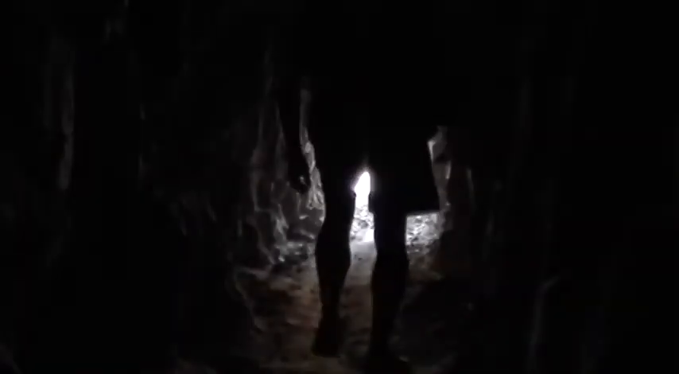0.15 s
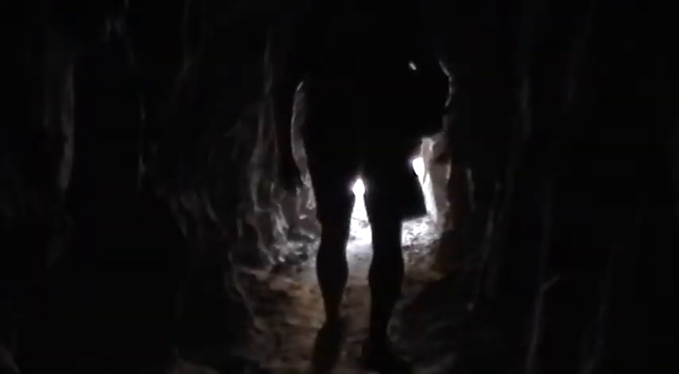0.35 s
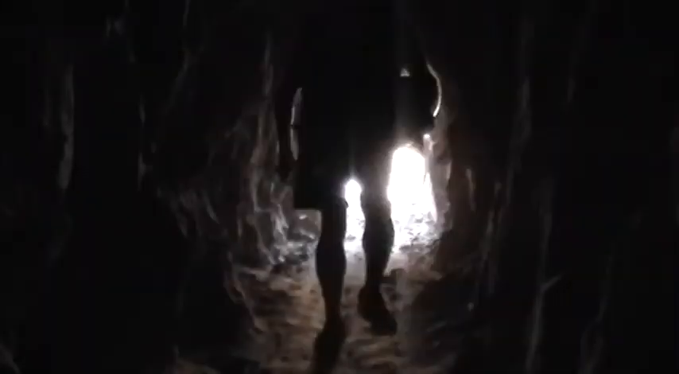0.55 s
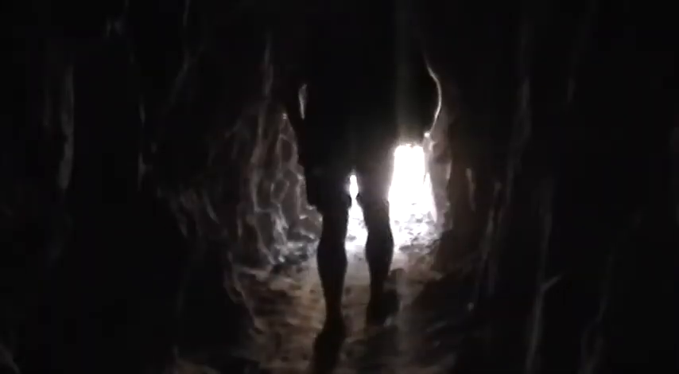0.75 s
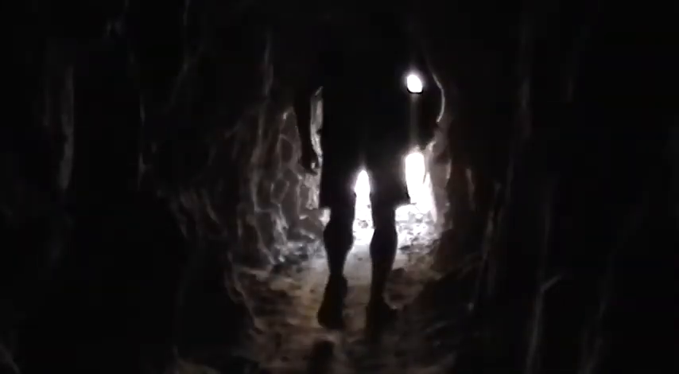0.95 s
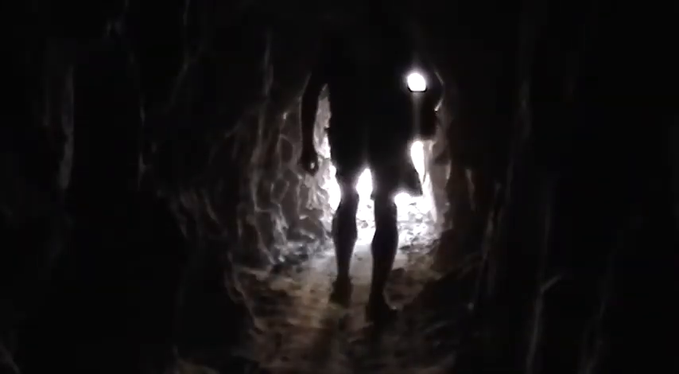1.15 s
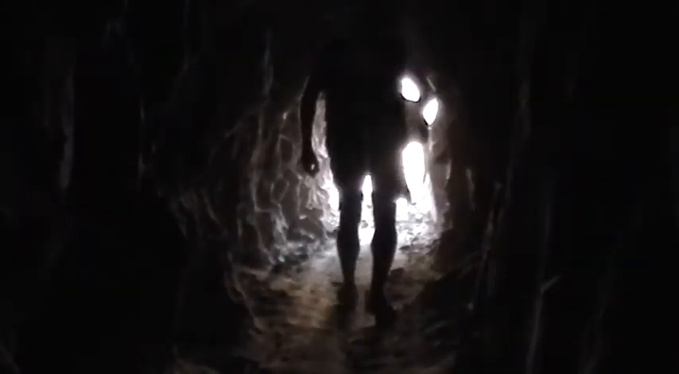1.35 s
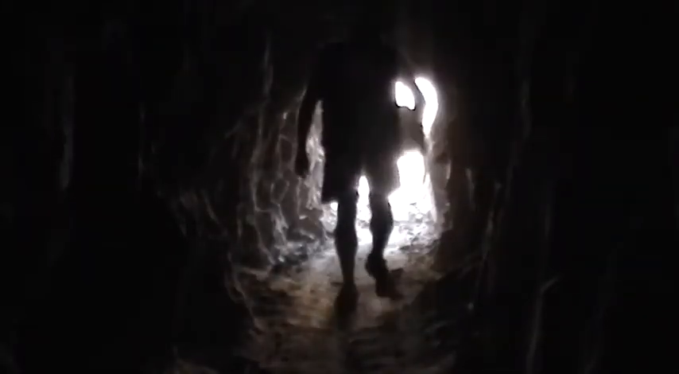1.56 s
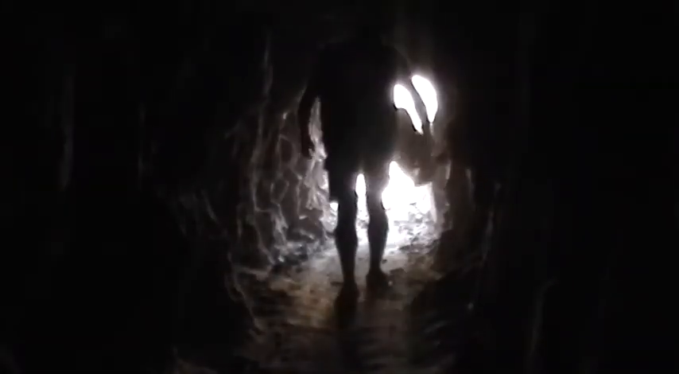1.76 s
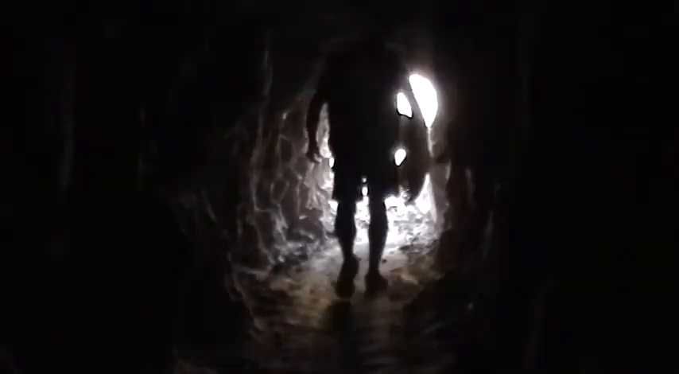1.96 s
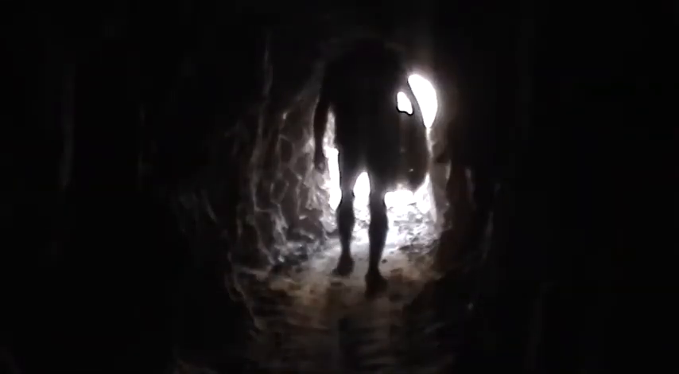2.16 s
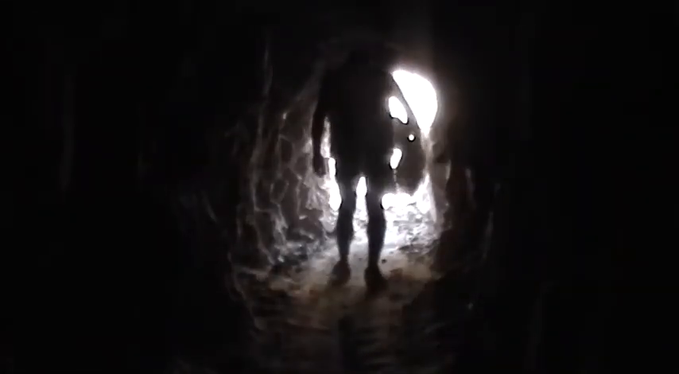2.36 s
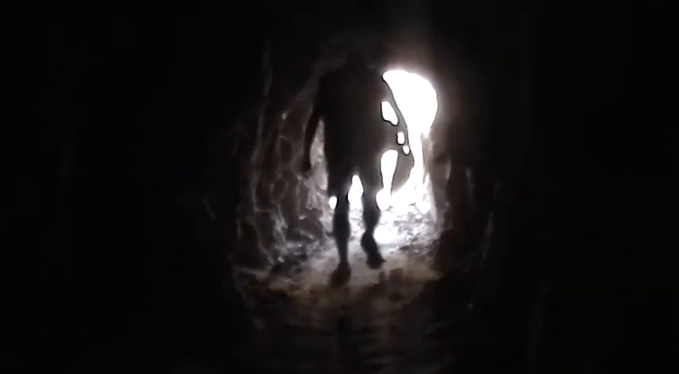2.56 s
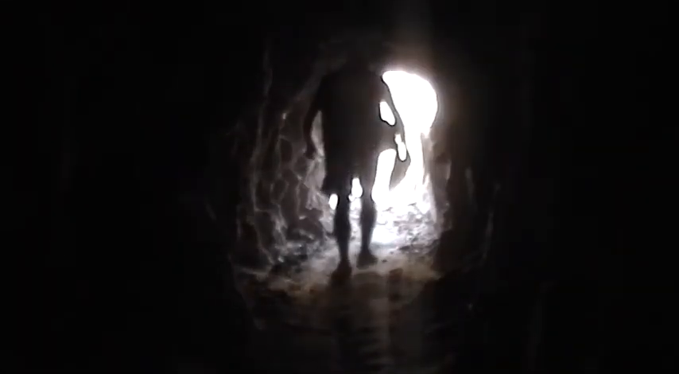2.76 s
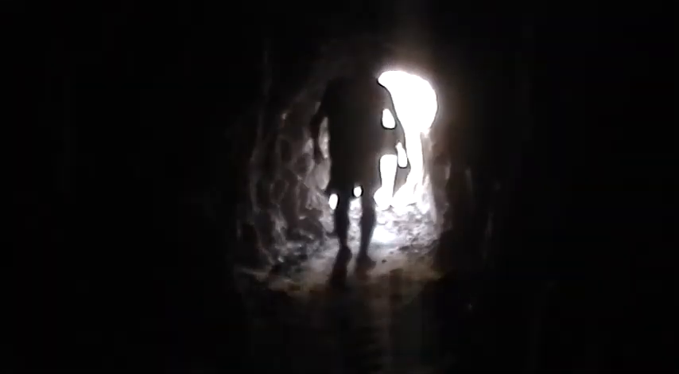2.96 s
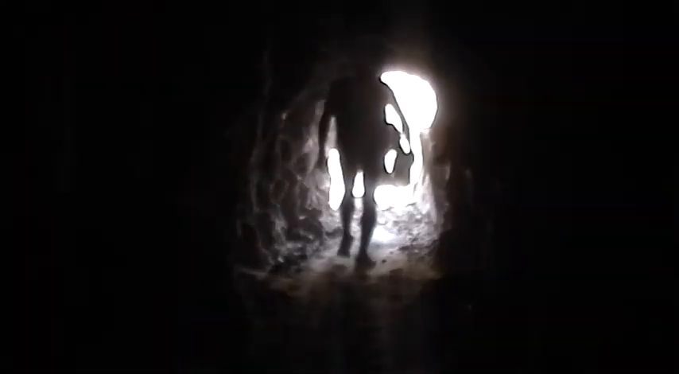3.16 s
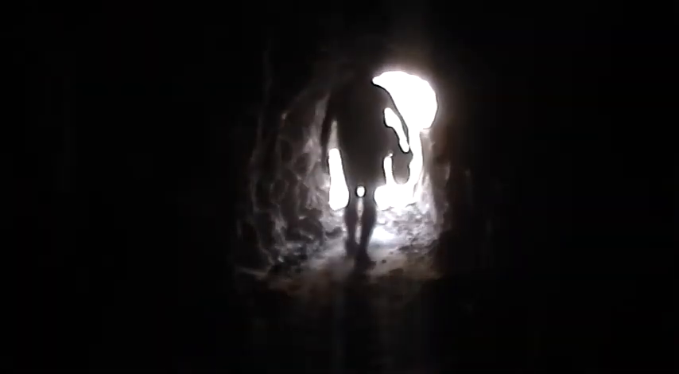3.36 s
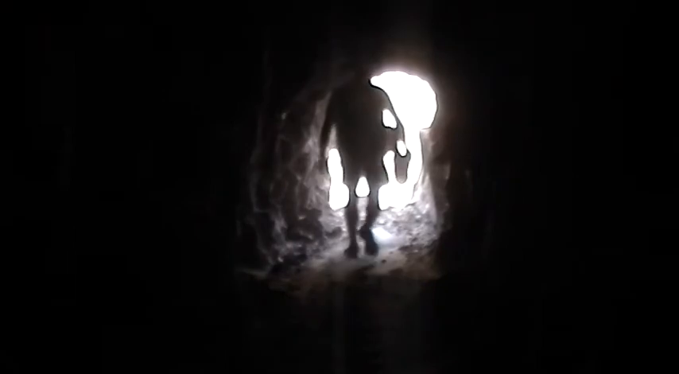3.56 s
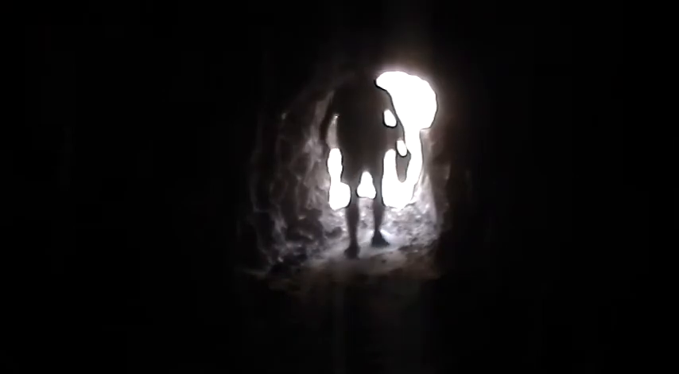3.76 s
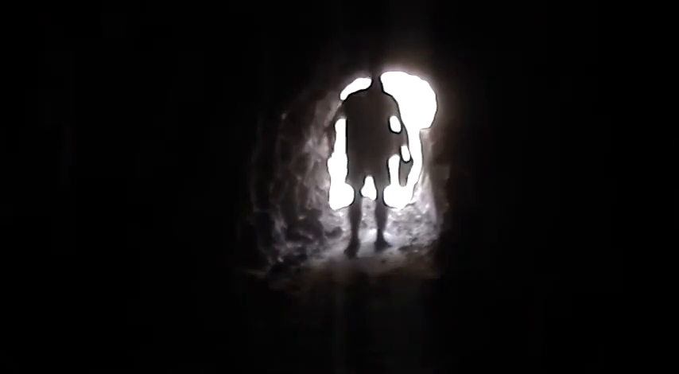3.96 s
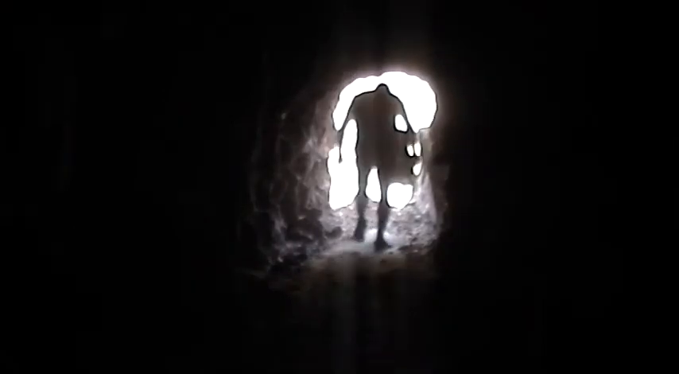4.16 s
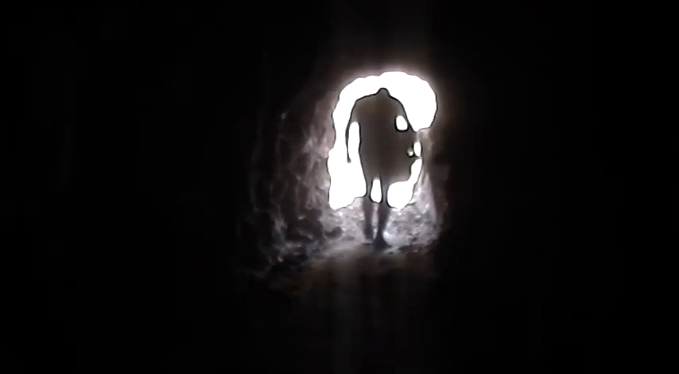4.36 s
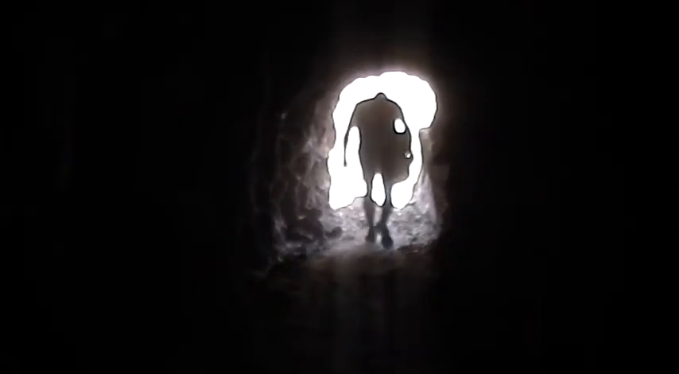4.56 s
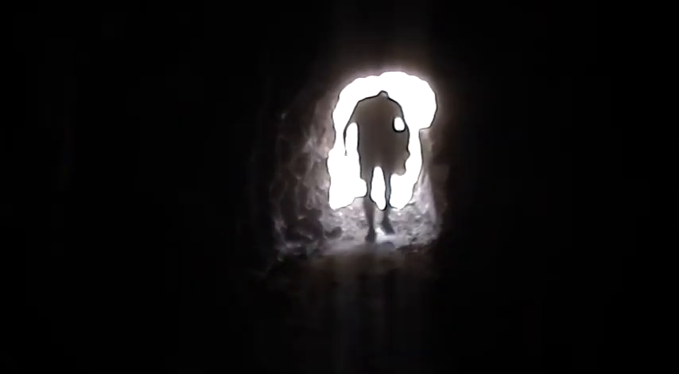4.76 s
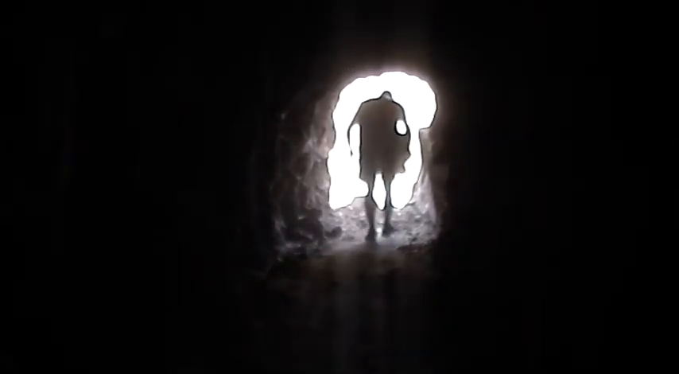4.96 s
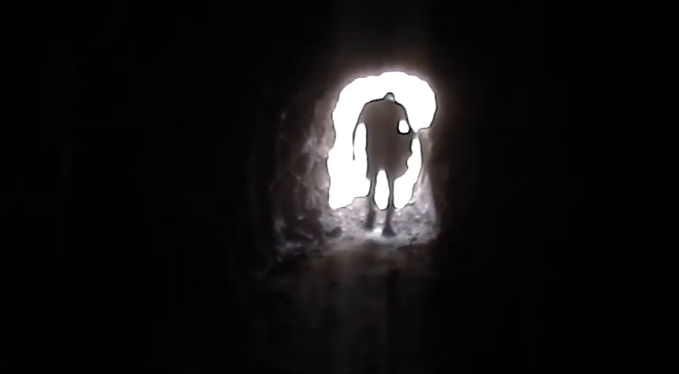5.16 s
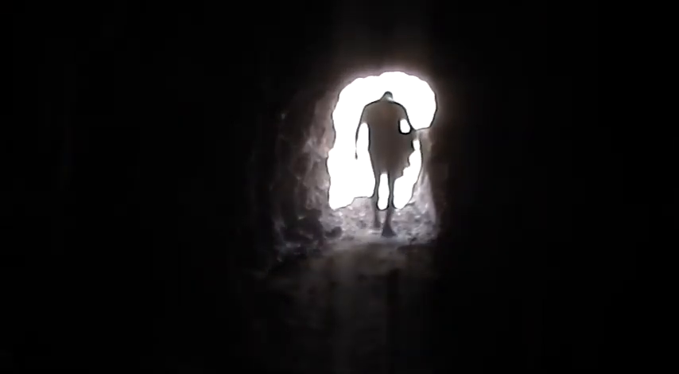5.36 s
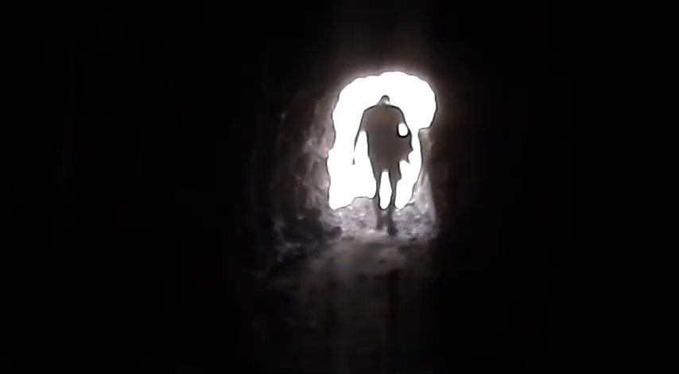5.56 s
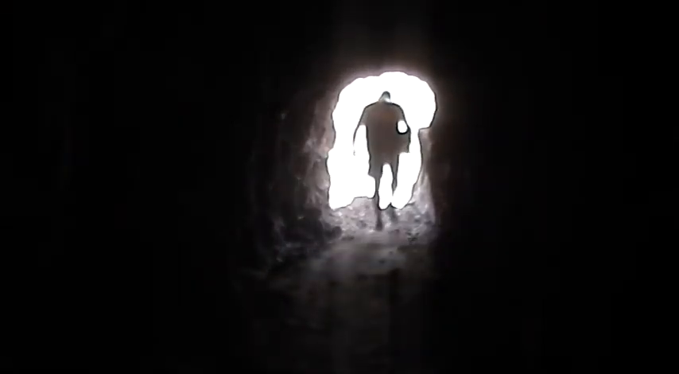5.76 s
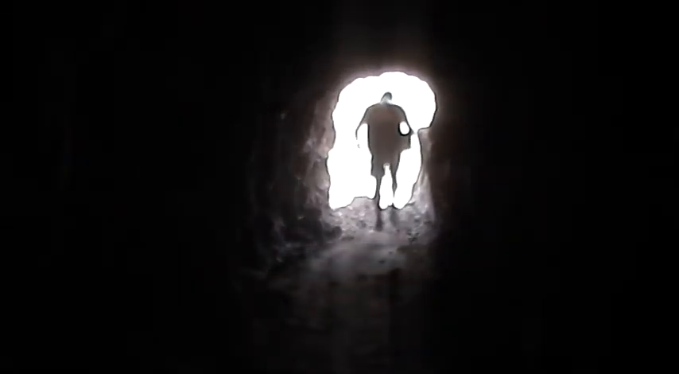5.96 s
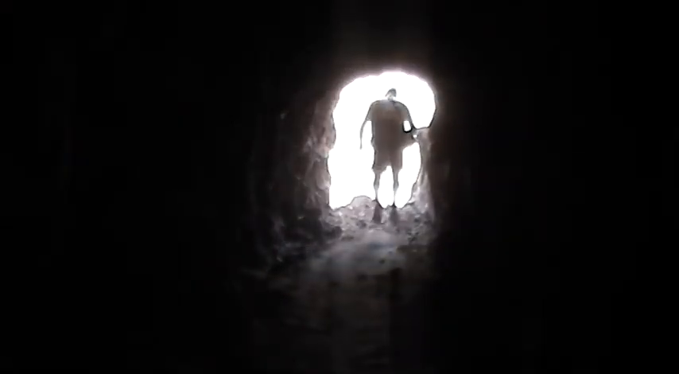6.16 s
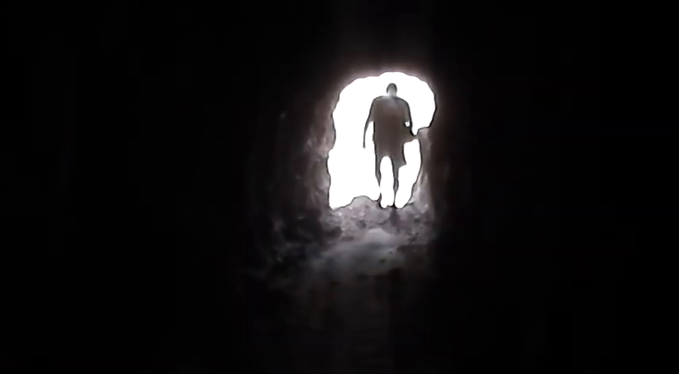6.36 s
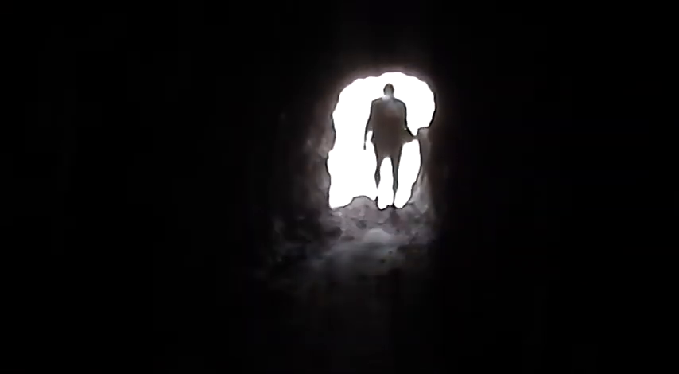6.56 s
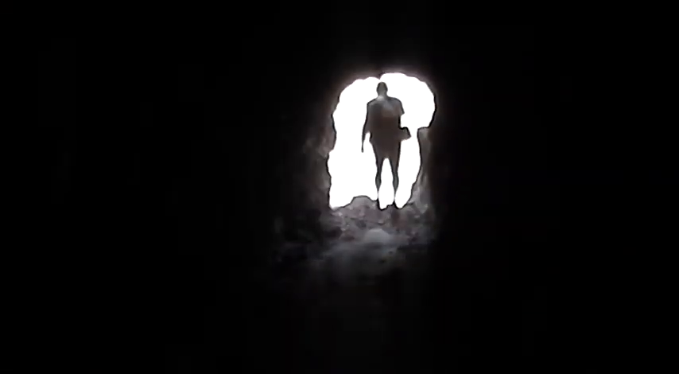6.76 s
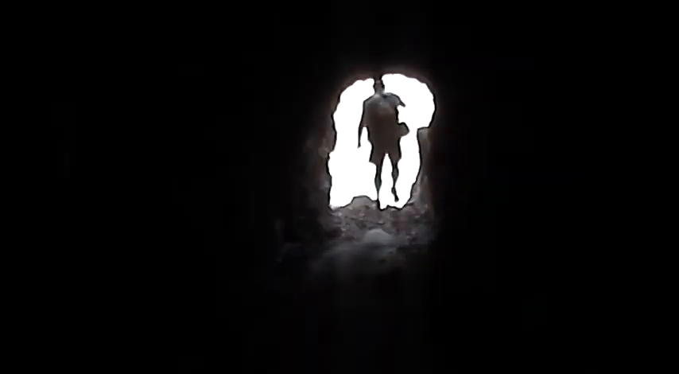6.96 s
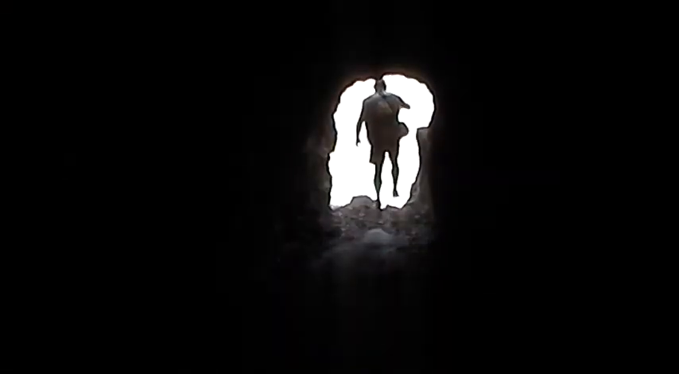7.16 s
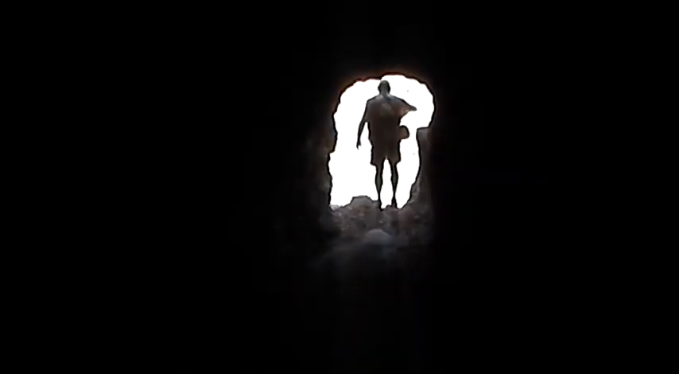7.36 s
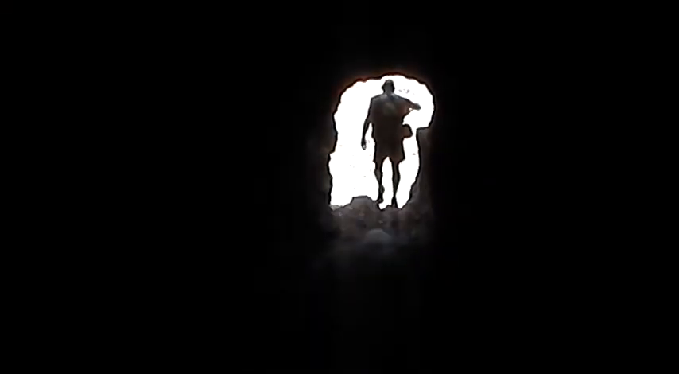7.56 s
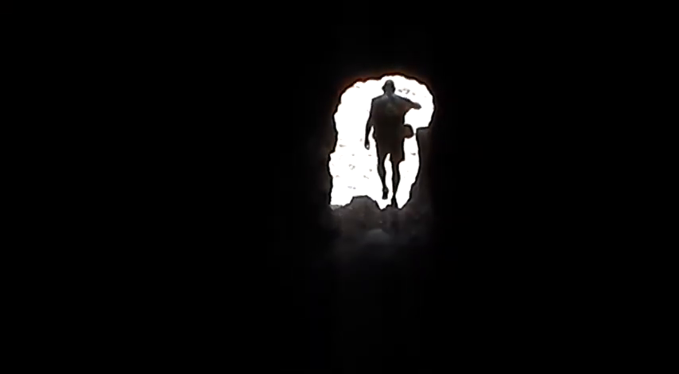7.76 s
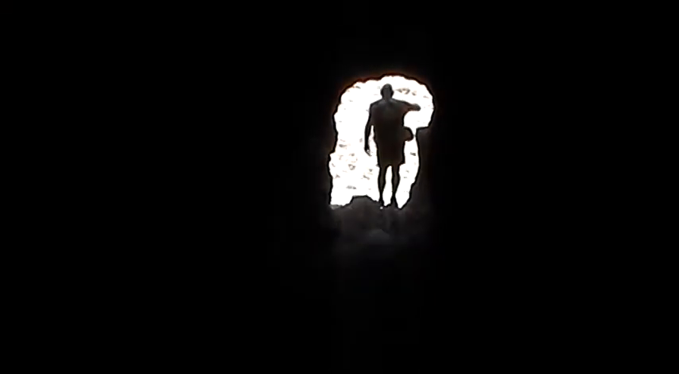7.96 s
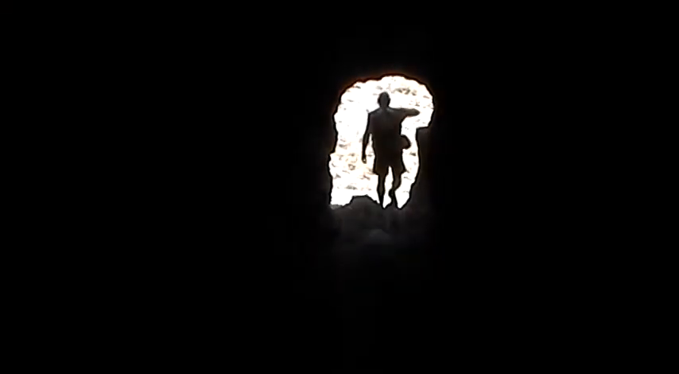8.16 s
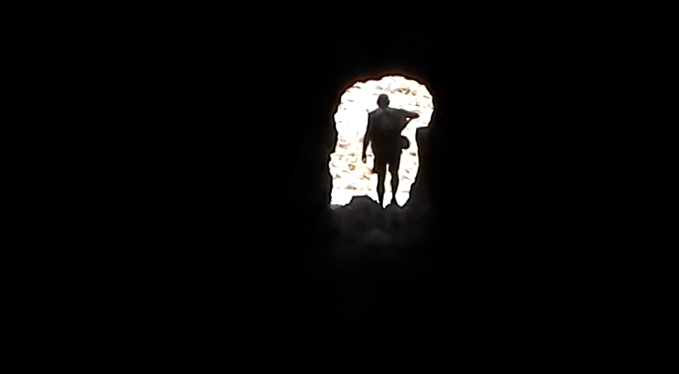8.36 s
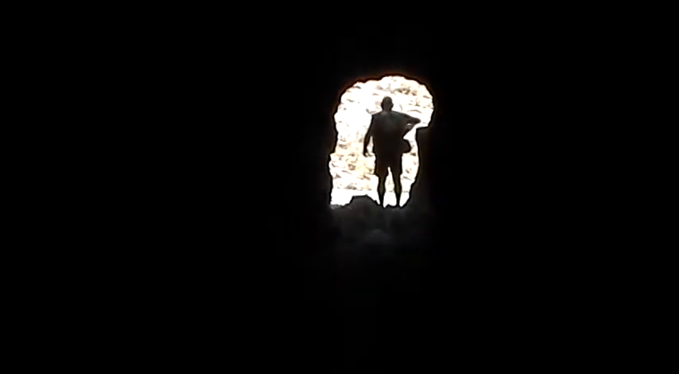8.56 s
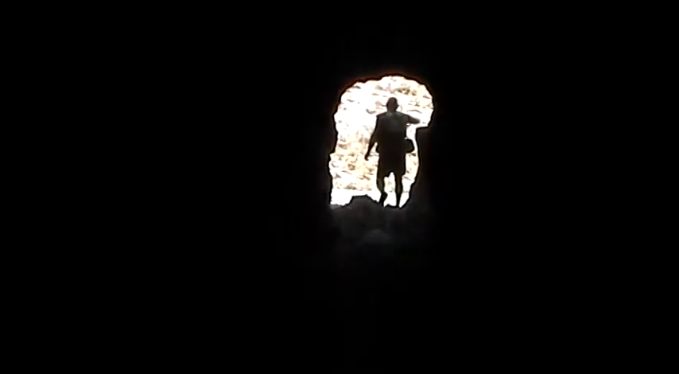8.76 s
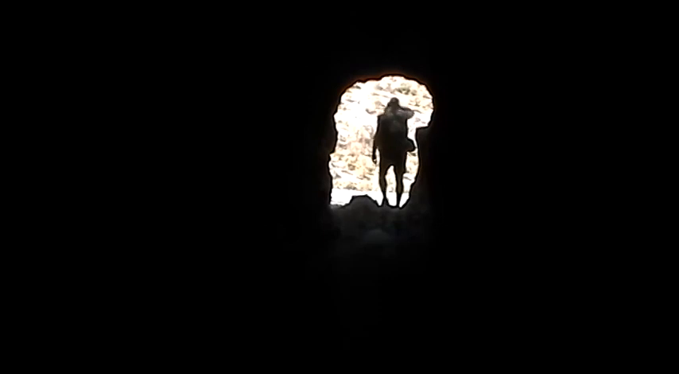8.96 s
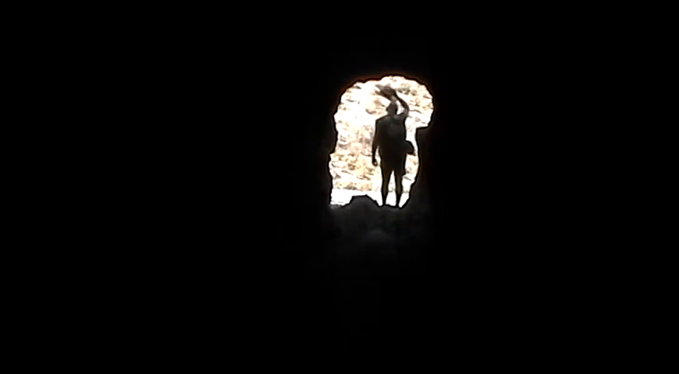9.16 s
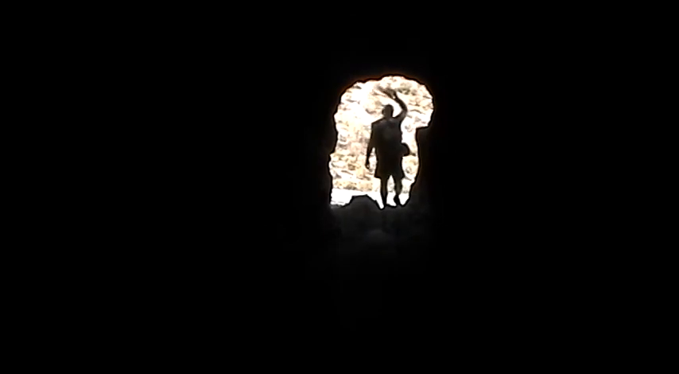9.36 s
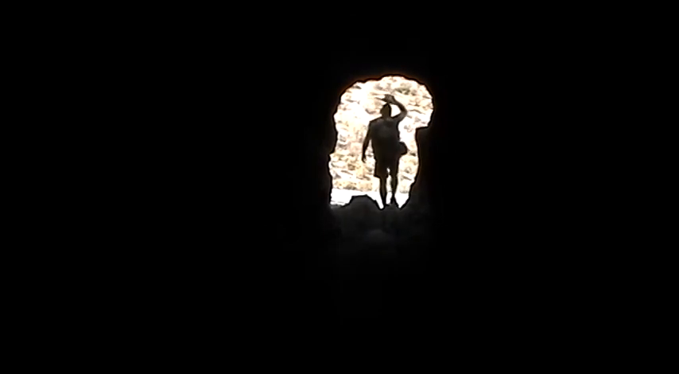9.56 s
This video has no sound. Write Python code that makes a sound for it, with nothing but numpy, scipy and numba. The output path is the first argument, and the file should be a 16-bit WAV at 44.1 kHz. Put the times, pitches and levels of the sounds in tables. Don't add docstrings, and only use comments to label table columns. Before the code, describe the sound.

A walker starts right beside a small stereo camcorder and heads off through a stony mine tunnel. Loud, hard cracks, dull thuds and gravelly scrapes come first, tangled with rolling pebbles and fine grit snaps. Something metal jingles faintly once. Later footfalls are quieter, separate crunches and small clicks, smeared by the rough walls with the low tones lingering. Soft tape hiss and motor rumble continue underneath throughout.

```python
import sys
import numpy as np
from scipy import signal
from scipy.fft import rfft, irfft, next_fast_len
from scipy.io import wavfile
from scipy.ndimage import uniform_filter1d
from numba import njit

SR = 44100
rng = np.random.default_rng(int(sys.argv[2]) if len(sys.argv) > 2 else 0)


def volts_from_decibels(level):
    exponent = np.asarray(level, float) / 20
    return 10 ** exponent


def to_wav(s):
    ch = np.atleast_2d(s).T
    pcm = np.round(np.clip(ch, -1, 1) * 32767)
    wavfile.write(sys.argv[1], SR, pcm.astype(np.int16))


N = 423889


def level(x, db):
    return x * volts_from_decibels(db) / np.sqrt(np.mean(x ** 2))


def shaped(gain, size):
    hz = np.arange(size // 2 + 1) * SR / size + 1
    return irfft(rfft(rng.standard_normal(size)) * gain(hz), size)


def coloured(points):
    hz, db = np.transpose(points)
    return shaped(lambda f: volts_from_decibels(np.interp(np.log(f), np.log(hz), db)), next_fast_len(N))[:N]


def walk(rate_hz):
    hold = int(SR / rate_hz)
    held = np.repeat(rng.standard_normal(N // hold + 1), hold)[:N]
    return uniform_filter1d(uniform_filter1d(held, hold), hold)


@njit
def rings(start, hz, t60, size):
    out = np.zeros(N)
    for g in range(len(start)):
        turn = 2 * np.pi * hz[g] / SR
        step = np.exp(1j * turn - np.log(1000) / t60[g] / SR)
        follow = 1 - np.exp(-turn)
        z, soft, softer = size[g] + 0j, 0., 0.
        first = max(int(start[g] * SR), 0)
        for i in range(first, min(first + int(t60[g] * SR) + 8, N)):
            z *= step
            soft += follow * (z.imag - soft)
            change = follow * (soft - softer)
            softer += change
            out[i] += 2 * change / turn
    return out


def grains(start, chance, hz, octaves, cycles, scatter_db, db):
    pitch = np.clip(hz * 2 ** (octaves * chance[0]), 50, 13000)
    size = volts_from_decibels(db + scatter_db * chance[1]) * np.sign(chance[2])
    return rings(start.ravel(), pitch.ravel(), (cycles / pitch).ravel(), size.ravel())


def camcorder():
    # pitch_hz, density_db
    hiss = [(15, -43), (25, -10.5), (123, 1), (306, -4), (1120, -11.5), (2870, -15), (3750, -15),
            (6260, -20.5), (8900, -19.5), (13200, -23.5), (15700, -22.5)]
    # pitch_hz, width_hz, level_db
    drive = [(3730, 120, -80), (5450, 160, -91), (7240, 470, -74.5), (11600, 340, -83.5), (14900, 250, -90)]
    # pitch_hz, density_db
    rumble_colour = [(15, -46), (25, -17), (140, 0.5), (315, -2.5), (745, -12.5), (976, -17), (3110, -35.5),
                     (4070, -38), (4410, -40), (10700, -45), (13000, -41), (15700, -54)]
    mid = level(coloured(hiss), -64.1)
    for hz, width, db in drive:
        band = shaped(lambda f: 1 / (1 + (2 * (f - hz) / width) ** 2), next_fast_len(N))[:N]
        mid = mid + level(band, db)
    rumble = level(coloured(rumble_colour), -56) * volts_from_decibels(1.7 * walk(2.04))
    return np.array([mid - 0.074 * rumble, rumble])


def scrapes():
    # start_s, length_s, level_db,
    # pitch_hz, spread_octaves
    drags = [(0.0, .012, -29, 1630, 0.22), (0.013, 0.026, -24, 2040, 0.11), (0.041, 0.024, -29, 1900, .15),
             (0.07, 0.0069, -38.5, 285, 0.27), (0.436, 0.028, -24, 2520, 0.63),
             (0.462, .04, -25.5, 1710, 0.18), (0.678, 0.018, -36, 3000, 0.041),
             (0.899, 0.032, -24.5, 5140, 0.12), (1.093, 0.018, -35, 7950, 0.31),
             (1.126, 0.014, -41, 10500, .2), (1.454, .04, -26, 421, 0.23), (1.858, 0.013, -28, 1960, .1),
             (1.884, 0.028, -20, 2016, 0.043), (1.888, 0.024, -21.5, 3050, 0.039),
             (1.89, 0.041, -18, 4800, .1), (1.90, 0.043, -24, 950, 0.34), (1.922, 0.035, -37, 2200, 0.33),
             (1.957, .025, -29, 637, .15), (2.022, 0.0042, -29, 3500, 0.44),
             (2.024, 0.0095, -23, 4300, 0.045), (2.025, .014, -24.5, 840, 0.29),
             (2.045, .05, -25, 780, 0.15), (2.10, .08, -33.5, 546, 0.16), (2.53, .008, -38, 13000, 0.092),
             (2.632, 0.053, -34, 750, 0.18), (2.773, 0.05, -29.5, 3330, 0.41),
             (2.981, 0.032, -39, 1010, 0.12), (3.056, 0.0085, -42, 8000, 0.36),
             (3.068, .03, -25, 2960, 0.23), (3.089, .04, -31.5, 990, 0.26), (6.106, 0.0085, -39, 10000, .2),
             (6.12, 0.019, -50, 496, 0.33), (6.229, 0.061, -40, 610, 0.42), (6.373, .004, -52, 9000, .2),
             (6.598, 0.0035, -48, 9970, .15), (6.745, .014, -48, 900, 0.45), (6.79, .03, -41, 3520, 0.13),
             (8.17, 0.0085, -59, 2850, .05), (8.69, 0.0093, -43, 10000, .3), (8.72, 0.078, -53, 500, 0.35),
             (0.052, .04, -33, 2000, .12), (0.068, 0.011, -34, 6760, .25), (0.336, .03, -43, 1408, .35),
              (0.353, .02, -48, 4000, .5), (0.434, 0.017, -28, 7000, .3), (1.893, 0.026, -18, 3600, 0.5),
              (1.91, 0.028, -24, 4200, .4), (2.631, 0.044, -37, 1900, 0.25), (2.708, .012, -43, 2800, .4),
              (3.076, 0.049, -35, 4200, .45), (4.61, 0.029, -39.5, 7940, .4), (4.556, .05, -44, 3500, 0.65),
              (5.144, 0.027, -36, 4400, .08), (5.15, .014, -46, 8500, .35), (6.115, 0.013, -48, 253, 0.4),
              (6.138, .012, -37, 414, 0.54), (5.563, .03, -36, 895, .4), (0.897, .035, -26, 5500, .35),
              (5.167, .04, -34, 4200, .5)]
    s, length, db, hz, octaves = np.array(drags).T[:, :, None]
    chance = rng.standard_normal((4, len(s), 24))
    along = np.clip((np.arange(24) + .5 + .4 * chance[3]) / 24, .01, .99)
    swell_db = 20 * np.log10(np.sin(np.pi * along ** .7)) - 6
    return grains(s + length * along, chance, hz, octaves, cycles=9.7, scatter_db=2.5, db=db + swell_db)


def cracks():
    # start_s, gravel_peak_db, pitch_hz,
    # thud_db, grit_db
    stone_knocks = [(0.001, -18, 1960, -35, -37), (0.036, -37, 2120, -28, -46), (0.071, -30, 1900, -28, -37),
                    (0.334, -26.5, 1090, -43, -45), (0.408, -35, 810, -32, -59),
                    (0.459, -15.5, 1820, -48, -37), (0.552, -26.5, 1670, -45, -30.5),
                    (0.678, -44, 2980, -44, -36.5), (0.734, -39, 1620, -60, -41.5),
                    (0.897, -17, 5930, -61, -43), (0.907, -38, 4450, -39, -29),
                    (0.982, -24.5, 2210, -42, -33), (1.1327, -38, 2880, -58, -37.5),
                    (1.444, -23.5, 2620, -29, -34.5), (1.861, -26, 1020, -31, -39),
                    (1.887, -22, 2120, -23, -30.5), (1.9063, -25, 2180, -40, -28.5),
                    (2.023, -17, 1000, -22.5, -37), (2.462, -23, 2820, -38, -34),
                    (2.625, -20.5, 819, -28, -48), (2.982, -23.5, 1000, -29, -36),
                    (3.068, -26, 1750, -22.5, -31.5), (3.444, -29.5, 1840, -23, -42),
                    (3.466, -37, 1010, -43, -42),
                    (3.57, -27.5, 1980, -56, -35.5), (4.002, -50, 3030, -62, -58),
                  (4.023, -32, 4960, -50, -46), (4.577, -38, 860, -36, -54), (4.644, -32, 3820, -44, -50),
                  (5.082, -55, 870, -57, -58), (5.146, -40, 4170, -67, -50), (5.166, -30, 3500, -51, -31),
                  (5.562, -31.5, 1510, -37.5, -35), (5.628, -33, 3930, -39, -51),
                  (6.108, -58, 1750, -49, -51), (6.139, -33, 880, -46, -45), (6.202, -35, 1750, -57, -37.5),
                  (6.532, -44, 1240, -66, -52), (6.763, -34.5, 1110, -39, -47),
                  (6.98, -39.5, 1130, -43, -51), (7.455, -38.5, 950, -32.5, -59),
                  (8.102, -42, 2790, -45, -53), (8.213, -51, 977, -43, -63), (8.246, -34.5, 1520, -39, -45),
                  (8.691, -51, 850, -41, -55), (8.706, -36.5, 1240, -54, -55),
                  (8.821, -38.5, 2500, -59, -52), (9.395, -40.5, 1070, -36, -61)]
    # start_s, peak_db, pitch_hz
    pebbles = [(0.175, -29, 880), (0.443, -31, 1190), (0.842, -36, 865), (1.0444, -52, 2260),
               (1.389, -38.5, 2220), (1.427, -35, 1920), (2.156, -55, 866), (2.216, -43, 795),
               (2.265, -36.5, 840), (2.44, -39, 1060), (2.523, -26, 1016), (2.755, -40, 1570),
               (2.774, -33, 2200), (2.8, -33, 1750), (2.936, -37.5, 1450), (3.381, -44, 885),
               (3.607, -30, 1660), (4.065, -34, 1340), (4.468, -39, 1650), (4.538, -38, 1060),
               (5.32, -38, 4300), (5.87, -40, 4330), (6.621, -37.5, 1500), (6.665, -45, 1220),
               (6.79, -34.5, 860), (6.872, -44, 935), (7.394, -44, 810), (7.489, -32, 1500),
               (8.174, -50, 2820), (8.262, -33.5, 1550),
               (0.659, -32, 7530),
        (1.049, -45, 8300),
        (2.753, -30, 4500),
        (5.165, -30, 5130),
        (4.86, -44, 2070),
        (7.415, -45, 1140),
        (7.927, -58, 2100),
        (8.9327, -54, 3540),
        (9.177, -49, 3900),
    ]
    small = []
    for s, db, hz in pebbles:
        thud_db = db - 8.5 - 7 * np.log2(hz / 1000)
        small.append((s, db, hz, thud_db, db - 14.5))
    knocks = stone_knocks
    s, gravel_db, hz, thud_db, grit_db = np.array(knocks + small).T[:, :, None]
    is_pebble = np.arange(len(s))[:, None] >= len(knocks)
    octaves = np.where(is_pebble, 0.17, 0.25)
    crush_s = np.where(is_pebble, 0.007, 0.012)
    chance = rng.standard_normal((3, 3, len(s), 24))
    chance[:, 0] = np.argsort(chance[:, 0]) / 7.3 - 1.57
    late = np.linspace(0, 1, 24) ** 1.5
    start = s - .001 + 1.6 * crush_s * late
    fade_db = -11 * late - 1.5 * np.exp(-late / 0.2)
    thud = grains(start, chance[0], 428, 0.64, 2.5, 0.5, thud_db - 6.5 + fade_db)
    gravel = grains(start, chance[1], hz, octaves, 8.1, 0.53, gravel_db - 7.5 + fade_db)
    grit = grains((s + start) / 2, chance[2], 5930, 0.4, 4.6, 1.4, grit_db + 6 + fade_db)
    return thud + gravel + grit


def ticks():
    # start_s, level_db, pitch_hz, spread_octaves
    edges = [(0.001, -28, 1490, 0.63), (0.333, -38.5, 1200, 0.46), (0.457, -25, 1810, 0.43),
             (0.462, -28, 3800, 0.18), (0.479, -27, 2960, 0.36), (0.56, -28, 4200, 0.23),
             (0.678, -34.5, 3050, 0.12), (0.838, -41, 2470, 1.2), (0.9, -29, 5000, 0.51),
             (0.98, -33, 4000, 0.82), (1.444, -42, 1990, 0.84), (1.89, -19, 2500, 0.67),
             (1.904, -22, 1200, 0.19), (1.932, -29, 1990, .6), (2.0245, -24, 2500, 0.93),
             (2.461, -37, 3000, 0.42), (2.626, -29, 1200, 0.68), (2.751, -42, 5000, 0.55),
             (2.984, -25.5, 2480, 0.59), (3.068, -21.5, 1480, 0.98), (3.072, -28.5, 2500, 0.46),
             (3.093, -28, 1800, 0.63), (3.446, -34, 2190, 0.81), (4.007, -51, 5000, 1),
             (4.537, -53, 1103, 0.42), (4.645, -33, 4470, 0.46), (5.166, -27.5, 4530, 0.19),
             (5.56, -36, 3220, 0.54), (6.106, -56, 3000, 0.72), (6.202, -51, 5000, 0.45),
             (7.927, -56, 2090, 0.1), (8.175, -54, 3300, .3), (8.935, -56, 3500, .1),
             (9.176, -52, 3740, .15), (2.775, -38, 3500, 0.55), (2.789, -41, 4000, 0.49),
             (2.815, -31, 2000, 0.54), (5.143, -42, 3000, .5), (5.152, -42, 6000, .5),
             (5.159, -32.5, 6000, .6), (4.40, -46, 7000, .5), (2.019, -35, 3000, 0.56),
             (0.074, -30.5, 500, .6)]
    s, db, hz, octaves = np.array(edges).T[:, :, None]
    chance = rng.standard_normal((3, len(s), 8))
    chance[0] = np.argsort(chance[0]) / 2.3 - 1.5
    late = np.linspace(0, 1, 8)
    start = s - .0005 + 0.0014 * late
    return grains(start, chance, hz, octaves, cycles=6.2, scatter_db=1.0, db=db - 3.5 - 6 * late)


def load(size):
    # full_load_s, ground_db, coarse_db, gravel_db, grit_db
    landings = [(0.003, -53, -32.5, -37.5, -55), (0.08, -41.5, -35.5, -44.5, -47),
                (0.465, -52.5, -30.5, -39, -41), (0.915, -68, -55, -38.5, -45.5),
                (1.458, -49.5, -36, -33, -47), (1.872, -69, -36, -58, -48.5), (1.905, -62, -44, -27, -50),
                (2.035, -68, -29.5, -40.5, -47.5), (2.475, -49, -37.5, -40, -46.5),
                (2.65, -51, -39, -50.5, -73), (2.762, -53, -63, -66, -60), (2.995, -67, -47, -33, -45),
                (3.08, -69, -32, -39, -50), (3.464, -54, -32.5, -39, -48), (5.575, -54, -39.5, -44, -47.5),
                (3.54, -70, -61, -46, -46.5), (5.085, -53, -46.5, -53, -73), (5.635, -56, -62, -57, -51),
                (7.318, -55, -47.5, -73, -85), (8.215, -48.5, -56, -54, -60), (8.275, -48, -39.5, -50, -58),
                (6.15, -49, -37.5, -46, -68), (6.79, -55, -38.5, -48, -62), (8.73, -60, -40, -57.5, -67)]
    # full_load_s, ground_db, coarse_db, gravel_db, grit_db
    rolls = [(0.42, -56, -42, -43.5, -52), (1.04, -55.5, -43, -45, -49), (2.075, -68, -43, -56, -68),
             (2.54, -49, -48, -41.5, -51), (3.505, -62, -56, -46, -59), (3.59, -75, -63, -43.5, -59),
             (4.09, -59.5, -47, -45.5, -52.5), (4.56, -72, -49, -51, -66), (4.66, -59, -50.5, -52, -57),
             (2.8, -62, -66, -48, -66), (5.175, -66, -68, -49, -51.5), (5.685, -66, -67, -56.5, -61),
             (6.22, -66, -40, -56, -57), (6.68, -63, -68, -54.5, -61.5), (7.41, -54, -47.5, -63, -84),
             (7.5, -50, -48, -50.5, -65), (8.14, -75, -77, -68, -66), (8.83, -65, -60, -61, -63.5),
             (9.4, -60, -49, -58.5, -68)]
    # quick_fall_db_per_s, trickle_db, trickle_fall_db_per_s, shuffle_between_steps_db
    settling = [(131, -10, 35, -73.5), (132, -15.5, 34, -54), (156, -22.5, 41, -58.5),
                (166, -21, 42, -61.5)]
    t = np.arange(0, N + 64, 64) / SR
    quick, trickle_db, slow, shuffle_db = settling[size]
    power = volts_from_decibels(shuffle_db - 2 * t) ** 2
    for table, rise, speed in ((landings, 642, 1), (rolls, 132, 0.98)):
        for s, *db in table:
            after = speed * np.maximum(t - s, 0)
            settle = (volts_from_decibels(-quick * after) + volts_from_decibels(trickle_db - slow * after)) / (1 + volts_from_decibels(trickle_db))
            press = volts_from_decibels(db[size] + rise * np.minimum(t - s, 0))
            power = power + (press * settle) ** 2
    return np.interp(np.arange(N) / SR, t, np.sqrt(power))


def grinding():
    # middle_pitch_hz, spread_octaves, ring_cycles, grains_per_s, size_scatter_db, layer_level_db
    ground = (118, 0.5, 1.5, 150, -2.5, 3)
    # hz, octaves, cycles, per_s, db, db
    coarse = (416, 0.52, 3.5, 1300, 2.5, -10.5)
    # hz, octaves, cycles, per_s, db, db
    gravel = (1597, 0.826, 3, 5500, 2.5, -3)
    # hz, octaves, cycles, per_s, db, db
    grit = (5000, 0.55, 4, 5500, 4, -2)
    out = 0
    for k, kind in enumerate((ground, coarse, gravel, grit)):
        hz, octaves, cycles, per_s, scatter_db, layer_db = kind
        chance = rng.standard_normal((3, 60000))
        start = np.cumsum(rng.exponential(size=60000)) / per_s
        chance[1] = np.minimum(chance[1] ** 2 / 2, 3)
        used = start < N / SR
        steady = grains(start[used], chance[:, used], hz, octaves, cycles, scatter_db, 0)
        out = out + level(steady, layer_db) * load(size=k)
    return out


def pings():
    # start_s, level_db, pitch_hz
    strikes = [(0.677, -36, 2920), (1.443, -34.5, 2590), (2.019, -34, 4200), (3.466, -41, 8660),
               (4.468, -56, 8200), (4.538, -48, 950), (5.623, -40, 4520), (6.751, -55, 900),
               (6.758, -37.5, 9430), (7.927, -54, 2080), (8.1746, -49.5, 2900), (8.24, -50, 5000),
               (8.935, -52, 3400), (9.176, -53.5, 4700), (9.177, -58, 3360)]
    s, db, hz = np.transpose(strikes).copy()
    t60 = np.full(len(s), 0.012)
    return rings(s, hz, t60, volts_from_decibels(db))


def snaps():
    # start_s, peak_db, pitch_hz
    sand = [(2.6237, -44, 12300), (3.464, -28, 8200), (4.0073, -43, 10000), (4.0512, -47, 9100),
            (4.2577, -51, 7850), (4.3537, -49.5, 8500), (4.466, -43, 8050), (5.0794, -42, 7700),
            (5.679, -39, 9200), (5.8344, -58, 8370), (6.133, -34.5, 8930), (6.1495, -33.5, 8900),
            (6.3634, -48, 10100), (6.4894, -49, 10500), (6.757, -46, 9200), (7.6061, -54, 8150),
            (8.1229, -49, 7870)]
    s, db, hz = np.array(sand).T[:, :, None]
    chance = rng.standard_normal((3, len(s), 6))
    late = np.linspace(0, 1, 6) ** 1.5
    return grains(s + 0.0044 * late, chance, hz, 0.53, cycles=12.5, scatter_db=-7.0, db=db - 8 * late)


def jingle():
    # pitch_hz, level_db, t60_s
    modes = [(7040, -14, 0.091), (7540, -6, 0.24), (9510, -12.5, 0.2), (9680, -10, 0.3), (10630, -16, 0.2),
             (10960, -17, 0.23), (11500, -12, 0.11), (12280, -21, 0.3), (13570, -19, 0.2),
             (14100, -15, 0.13), (14500, -15, 0.1), (15130, -20, 0.2)]
    # start_s, level_db
    touches = [
        (3.535, -41.5),
        (3.545, -45),
        (3.556, -51),
        (3.569, -58),
        (3.583, -53),
        (3.602, -59),
        (3.626, -61),
    ]
    hz, db, t60 = np.transpose(modes)
    s, touch_db = np.array(touches).T[:, :, None]
    size = volts_from_decibels(touch_db + db + 2.7 * rng.standard_normal((len(touches), len(hz))))
    t60 = np.minimum(t60, .16)
    return rings(*(np.ravel(v + 0 * size) for v in (s, hz, t60, size)))


def cross_modes(x):
    # pitch_hz, width_hz, lift_db
    resonances = [(120, 12, 4.5), (227, 11.5, 3), (390, 16.4, 5), (651, 18, 1), (950, 26, 2)]
    out = x
    for hz, width, db in resonances:
        b, a = signal.iirpeak(hz, hz / width, SR)
        out = out + signal.lfilter(b, a, x) * (volts_from_decibels(db) - 1)
    return out


def walls(x, places, size, longest_s):
    # band_hz, t60_s, echo_db, sideways_share_db
    bands = [(82, 0.14, -10.5, -5), (183, 0.71, -8.5, -0.5), (347.5, 1, 0, -9.5), (709, 0.63, 2, -8.5),
             (1504, 0.5, 1.5, -9), (2980, 0.3, 2, -13.5), (5930, 0.31, -2, -19), (12300, 0.26, 2, -32)]
    t, f = np.arange(size) / SR, np.arange(size // 2 + 1) * SR / size + 1
    noise, echo = rfft(rng.standard_normal((2, places, size))), 0
    for hz, t60, db, side_db in bands:
        decay = volts_from_decibels(-60 * t / min(t60, longest_s))
        decay = decay / np.sqrt(np.sum(decay ** 2))
        window = np.cos(np.pi / 2 * np.clip(np.log2(f / hz), -1, 1)) ** 2
        gain = volts_from_decibels(db + np.array([0, side_db]))[:, None, None]
        echo = echo + irfft(noise * window, size) * gain * decay
    hop = N // (places - 1) + 1
    padded, out = np.pad(x, (hop, 2 * hop)), np.zeros((2, N + 3 * hop + size))
    parts = np.array([padded[k * hop:(k + 2) * hop] for k in range(places)])
    parts = parts * np.sin(np.pi * np.arange(2 * hop) / (2 * hop))
    heard = signal.fftconvolve(np.float32(parts[None]), np.float32(echo), axes=2)
    for k in range(places):
        out[:, k * hop:(k + 2) * hop + size - 1] += heard[:, k]
    return out[:, hop:hop + N]


def tunnel(x):
    direct = x * np.array([[1], [0]])
    near = walls(x, places=400, size=2048, longest_s=0.082)
    far = walls(x, places=32, size=20480, longest_s=2)
    return volts_from_decibels(-5) * direct + volts_from_decibels(-1.5) * near + volts_from_decibels(-4) * far


def scene():
    dull = signal.butter(2, 11100, fs=SR, output="sos")
    edges = signal.sosfilt(dull, ticks()) + pings()
    stones = signal.sosfilt(dull, cracks()) + snaps() + scrapes() + edges + grinding()
    steps = tunnel(cross_modes(stones) + jingle())
    steps = steps + volts_from_decibels(-0.5) * edges * np.array([[1], [0]])
    steps = signal.sosfilt(signal.butter(3, 101, "high", fs=SR, output="sos"), steps)
    treble = signal.butter(2, 11900, "high", fs=SR, output="sos")
    lag = signal.sosfiltfilt(treble, np.gradient(steps[0]))
    mid, side = steps + camcorder()
    side = side + volts_from_decibels(-5) * lag
    return np.array([mid + side, mid - side])


def low_pass(x):
    return signal.sosfilt(signal.butter(12, 15740, fs=SR, output="sos"), x)


def record(dry):
    mix = signal.sosfilt(signal.ellip(10, .3, 70, 15790, fs=SR, output="sos"), dry)
    return low_pass(mix)


dry = scene()
out = record(dry)
to_wav(out)
```